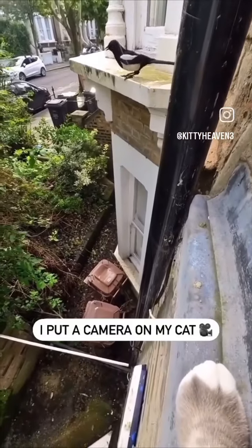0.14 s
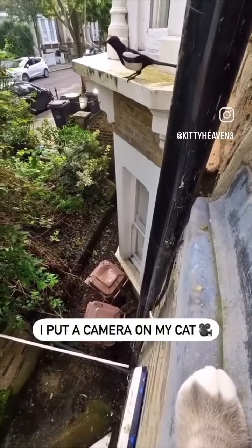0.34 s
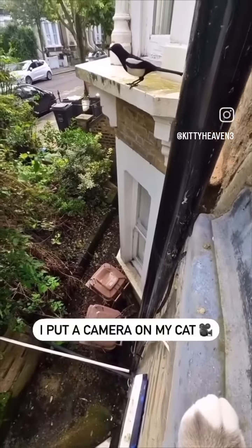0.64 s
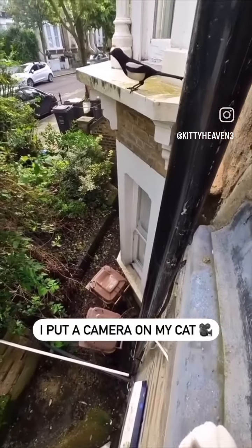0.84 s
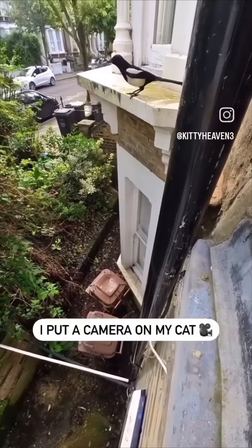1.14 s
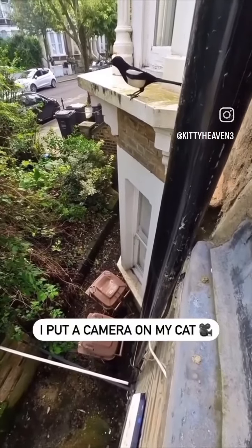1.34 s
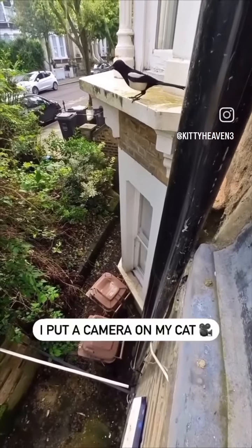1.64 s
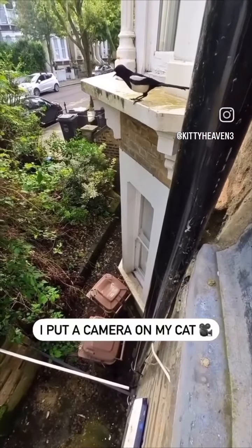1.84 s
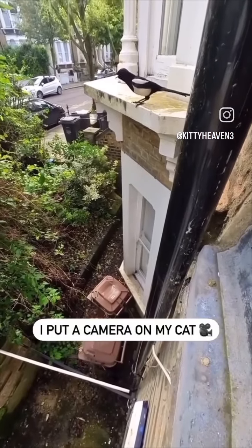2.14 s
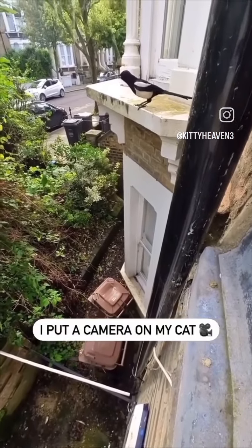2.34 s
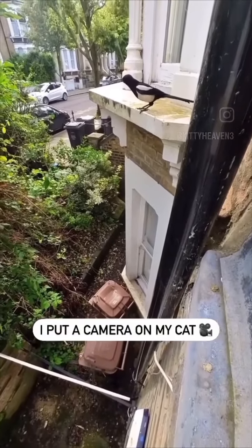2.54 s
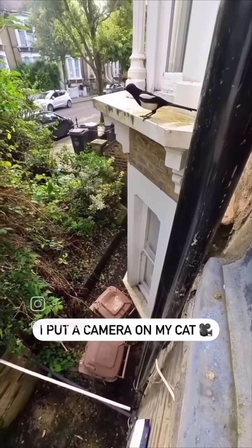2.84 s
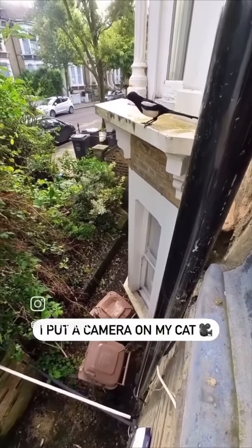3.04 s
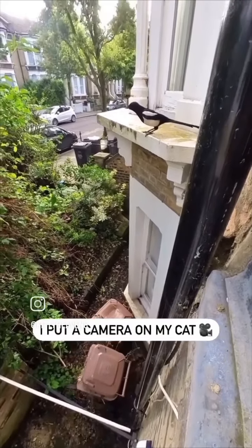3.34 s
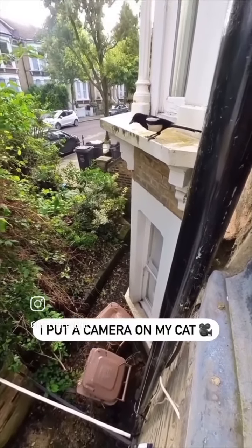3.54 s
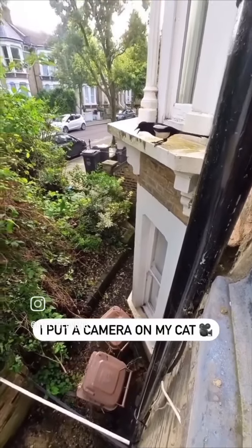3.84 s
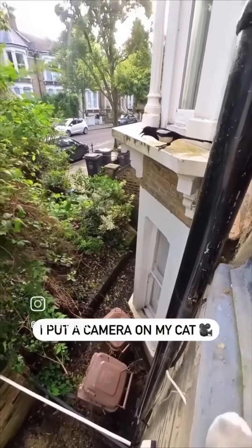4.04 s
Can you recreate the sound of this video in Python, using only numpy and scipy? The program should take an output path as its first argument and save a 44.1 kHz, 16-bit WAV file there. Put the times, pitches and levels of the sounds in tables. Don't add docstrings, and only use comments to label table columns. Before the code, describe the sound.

Low traffic hum with the tail of an earlier rattle dying away. A short close meow, then a run of coarse, machine-like magpie rattles ringing between houses. After a brief gap the cat replies with trembling, gritty little chirps stretching into mewls, amid clicks of tongue, claw or collar. More magpie rattling ends it. Cat close and dry, bird farther and echoing.

```python
import sys
import numpy as np
from scipy import signal
from scipy.io import wavfile
from scipy.ndimage import uniform_filter1d

SR = 44100
rng = np.random.default_rng(int(sys.argv[2]) if len(sys.argv) > 2 else 0)


def unload_audio(sound):
    columns = np.transpose(np.atleast_2d(sound))
    steps = np.round(np.clip(columns, -1, 1) * 32767)
    wavfile.write(sys.argv[1], SR, steps.astype(np.int16))


def makeup_ratio(level_db):
    decades = np.asarray(level_db, float) / 20
    return 10 ** decades


N = 185127
T = np.arange(N) / SR


def evened(x):
    return x / np.sqrt(np.mean(x ** 2) + 1e-20)


def read(points, hz):
    f, value = np.transpose(points)
    return np.interp(np.log(hz + 1), np.log(f + 1), value)


def add(mix, s, sound):
    part = mix[round(s * SR):][:len(sound)]
    part += sound[:len(part)]


def follow(rows):
    return np.interp(T, *np.transpose(rows))


def curves(rows):
    s, *columns = np.transpose(rows)
    return s[0], [np.interp(np.arange(s[0], s[-1], 1 / SR), s, c) for c in columns]


def whole(tables, column, quiet):
    out = np.full(N, float(quiet))
    for rows in tables:
        s, values = curves(rows)
        out[round(s * SR):][:len(values[column])] = values[column]
    return out


def steps(starts, values):
    at = np.clip(np.searchsorted(starts, T) - 1, 0, None)
    return uniform_filter1d(np.asarray(values, float)[at], size=200)


def resonate(x, hz, width):
    return signal.lfilter(*signal.iirpeak(hz, hz / width, SR), x)


def resonate_twice(x, hz, width):
    return resonate(resonate(x, hz, width), hz, width)


def lowpass(x, hz):
    return signal.sosfiltfilt(signal.butter(2, hz, fs=SR, output="sos"), x)


def coloured(points, patchy_db, size):
    hz = np.fft.rfftfreq(size, 1 / SR)
    a, b, patches = rng.standard_normal((4 * N // size + 5, len(hz), 3)).T
    patches = evened(uniform_filter1d(uniform_filter1d(patches, size=7, axis=0), size=9, axis=1))
    z = (a + 1j * b) * makeup_ratio(read(points, hz)[:, None] + patchy_db * patches)
    return evened(signal.istft(z, nperseg=size, noverlap=3 * size // 4)[1][:N])


def wander(width):
    return evened(uniform_filter1d(uniform_filter1d(rng.standard_normal(N), width), width))


def gusts(rows):
    out = np.zeros(N)
    for s, length, db, fall_db in rows:
        u = np.linspace(0, 1, round(length * SR))
        add(out, s, makeup_ratio(db + fall_db * u ** 2) * np.minimum(u * length / 0.002, 1))
    return out


# f/Hz, level/dB per Hz
HUM_COLOUR = [(12, -49.5), (20, -7.5), (107, 0.5), (223, -3.5), (261, -3), (396, -4.5), (464, -10.5),
              (515, -10.5), (847, -18), (941, -20.5), (1320, -28.5), (1810, -31), (2550, -34.5),
              (7650, -48.5), (10500, -58), (13600, -99), (22000, -120)]
# t/s, level/dB
TRAFFIC = [(0, 5), (.6, 5), (1, 4), (1.5, 2.5), (2.102, 3.5), (2.6, 2.5), (3.1, 0.5), (3.6, -1), (4.2, 0.5)]
# start t/s, length/s, level/dB, fall/dB
PEEP = [(3.472, 0.028, -41.5, -30)]


def town():
    noise = coloured(HUM_COLOUR, patchy_db=2.0, size=1024)
    low, below = lowpass(noise, 115), lowpass(noise, 750)
    traffic_db = follow(TRAFFIC)
    rumble = makeup_ratio(-43.5 + 0.36 * traffic_db) * evened(low)
    drone = makeup_ratio(-41.5 + traffic_db) * evened(below - low)
    hiss = makeup_ratio(-49 + 0.51 * traffic_db) * evened(noise - below)
    return rumble + drone + hiss + gusts(PEEP) * np.sin(2 * np.pi * 2100 * T)


def earlier_echo():
    bands = np.zeros(N)
    for hz, width, up_db, _ in BEAK:
        fall_db = 60 * T / read(ECHO_DECAY, hz)
        ring = resonate_twice(rng.standard_normal(N), hz, 2.17 * width)
        bands += makeup_ratio(up_db + 1.0 * (hz < 2400) - fall_db) * ring
    return makeup_ratio(-24.5 + 8.0) * bands * (1 + 0.34 * np.exp(-T / 0.012))


# t/s, peak level/dB, f/Hz
TICKS = [(.41, -38, 2700), (0.411, -36.5, 1260), (.626, -32, 1280), (.657, -47, 5220), (0.682, -37, 2900),
         (.7, -45, 4920), (1.473, -33.5, 990), (2.575, -31, 1280), (2.681, -23, 1260), (2.9, -26, 2000),
         (3.101, -17.5, 2350), (3.174, -28, 2400), (3.377, -28.5, 5100), (3.389, -19.5, 2420)]


def ticks():
    out, t = np.zeros(N), np.arange(500) / SR
    for (s, db, hz), noise in zip(TICKS, rng.standard_normal((len(TICKS), 500))):
        ring = np.sin(2 * np.pi * hz * t) * np.exp(-t / 0.00083)
        click = resonate(noise, 3000, 4000) * np.exp(-t / 0.00041)
        add(out, s, makeup_ratio(db) * (2.96 * ring + 0.14 * click))
    return out


def note(rows):
    attack_s, release_s, edge_db = 0.0026, 0.0097, -23
    s, (hz, effort_db, mouth) = curves(rows)
    t = np.arange(len(hz)) / SR
    edges = np.clip(1 - t / attack_s, 0, 1) + np.clip(1 - (t[-1] - t) / release_s, 0, 1) ** 2
    return np.transpose([s + t, hz, effort_db + edge_db * edges, mouth])


# t/s, pitch f/Hz, effort level/dB, mouth opening/0-1
MEOW = [(.79, 861, -19, 0.6), (.814, 858, -14.5, 0.48), (.83, 800.8, -13.5, 0.85), (.866, 825, -16.5, 0.63),
        (.94, 781, -18, 0.54), (.955, 805, -18, 0.42), (1.05, 781.3, -16.5, 0.4),
        (1.072, 744.2, -15.5, 0.39), (1.094, 793, -25.5, 0.88)]
# t/s, pitch f/Hz, effort level/dB, mouth opening/0-1
CHATTER = [
    [(2.651, 906, -29, .35), (2.666, 818, -16.5, 0.53), (2.688, 865, -21.5, 0.8)],
    [(2.705, 892, -24, .3), (2.716, 830, -16.5, 0.45), (2.73, 810, -18.5, 0.46), (2.75, 765, -19.5, 0.63)],
    [(2.769, 830, -20, 0.47), (2.789, 735, -19, .45), (2.797, 650, -21, 0.64), (2.816, 655, -17, 0.03)],
    [(2.843, 752, -19, .4), (2.86, 761, -23, 0.9), (2.9, 704.6, -21.5, 0.6)],
    [(2.912, 785, -23.5, .5), (2.926, 744, -20.5, 0.5), (2.938, 666, -21.5, 0.27), (2.95, 673, -20.5, 0.26),
     (2.964, 727, -15, 0.46)],
]
# t/s, pitch f/Hz, effort level/dB, mouth opening/0-1
MEWLS = [
    [(2.994, 782, -26, 0.34), (3.02, 757, -21.5, 0.7), (3.045, 789, -22, 0.62), (3.084, 739, -18.5, 0.42),
     (3.105, 715, -19.5, 0.52)],
    [(3.128, 820.5, -19, 0.52), (3.152, 759, -20.5, 0.68), (3.192, 830, -20.5, 0.49),
     (3.22, 765, -18.5, 0.44), (3.251, 732.5, -19.5, 0.46)],
    [(3.283, 819, -20.5, 0.46), (3.3, 819.5, -23, 0.47), (3.367, 794.6, -17, 0.39),
     (3.394, 793, -20.5, 0.41)],
]
# t/s, level/dB
CATCHES = [(0.827, -3), (1.066, -5.5), (2.661, -10), (2.672, -11.5), (2.723, -12.5), (2.798, -7),
           (2.949, -8.5), (3.087, -3.5), (3.227, -4.5)]
# leaking air level/dB, third harmonic level/dB, level of harmonics above the fourth/dB
LEAKS = [
    (-38.5, -8, -3),
    (-14, 4, -1),
    (-20, 9, 0),
    (-16.5, 0.5, 3),
    (-15.5, -12, -5),
    (-13.5, 0.5, 1),
    (-25, -3.5, -2),
    (-20.5, 1, 0),
    (-28.5, 9.5, 0),
]
# f/Hz, level/dB
THROAT = [(700, -2.5), (900, -0.5), (1300, -12.5), (1950, -9.5), (2400, -25.5), (2900, -11), (3200, -16),
          (3600, -31)]
# f/Hz, level/dB
MEW_TOP = [(3300, -2), (4000, -19), (4800, -22), (5600, -28.5), (6350, -24), (7150, -37.5), (8000, -57),
           (9500, -83.5)]


def mews():
    notes = [note(rows) for rows in [MEOW] + CHATTER + MEWLS]
    starts = [rows[0][0] - .003 for rows in notes]
    catch_db = sum(db * np.exp(-((T - s) / .0035) ** 2) for s, db in CATCHES)
    leak_db, third_db, top_db = (steps(starts, c) for c in np.transpose(LEAKS))
    leak_db = leak_db - 5 * catch_db / 10

    shake = .005 + .07 * makeup_ratio(leak_db)
    pitch_hz = uniform_filter1d(whole(notes, column=0, quiet=830), size=60)
    hz = pitch_hz * (1 + shake * wander(width=70) + .005 * catch_db)
    turns = 2 * np.pi * np.cumsum(hz) / SR

    effort_db = whole(notes, column=1, quiet=-93.5) + catch_db
    mouth = whole(notes, column=2, quiet=.4)
    mouth_hz = 1460 + 1042 * mouth
    level_db = [effort_db + read(THROAT, hz)]
    for k in range(2, 5):
        mouth_db = 17 / (1 + ((k * hz - mouth_hz) / 560) ** 2) ** 2
        level_db.append(effort_db + read(THROAT, k * hz) + mouth_db + 1.25 * wander(width=500))
    level_db[2] = level_db[2] + third_db
    top_db = level_db[0] + top_db + 0.5 * (mouth - .5)
    for k in range(5, 12):
        flicker_db = np.minimum(4.5 * wander(width=1300), 1.5) + 1.5 * wander(width=150)
        level_db.append(top_db + read(MEW_TOP, k * hz) + flicker_db - 5)

    bloom_db = -12.5 * np.exp(-np.maximum(T - steps(starts, starts), 0) / .015)
    level_db = level_db[:2] + [db + bloom_db for db in level_db[2:]]
    gains = [uniform_filter1d(makeup_ratio(db + 0.31 * wander(width=120)), size=90) for db in level_db]
    voice = sum(np.sqrt(2) * g * np.cos((k + 1) * turns + 0.78 * k) for k, g in enumerate(gains))
    breath = makeup_ratio(leak_db) * (gains[0] + gains[1]) * (1 + 0.35 * np.cos(turns))
    return voice, breath


# start t/s, length/s, level/dB, fall/dB
PUFFS = [(.757, .028, -52, -5.5), (1.055, 0.039, -41, -1.5), (1.088, 0.055, -39.5, -13.5),
         (1.103, 0.021, -35, -2.5), (2.68, 0.023, -29, -10.5), (2.745, 0.024, -30.5, 1),
         (2.812, 0.027, -25.5, 1.5), (2.895, 0.025, -34, -24), (2.964, .033, -24, -19),
         (3.098, 0.034, -30, -23.5), (3.245, 0.049, -29, -18.5), (3.39, 0.065, -31, -21),
         (3.413, 0.024, -33, -9)]
# f/Hz, level/dB per Hz
PUFF_COLOUR = [(180, -32), (300, -14), (569, -1.5), (1030, -7), (1490, -11.5), (2870, -3.5), (3540, -14),
               (4560, -20.5), (4980, -18.5), (6230, -20), (10500, -47.5), (13600, -77), (22000, -120)]
# start t/s, length/s, level/dB, fall/dB
WHEEZE = [(3.395, 0.031, -33.5, -10)]
# start t/s, length/s, level/dB, fall/dB
AIR = [(2.65, .81, -44.5, -4.5)]


def cat():
    voice, breath = mews()
    puffs = uniform_filter1d(gusts(PUFFS) * makeup_ratio(3.5), size=200)
    grit = makeup_ratio(1.7 * wander(width=50))
    wheeze = gusts(WHEEZE) * evened(resonate(rng.standard_normal(N), 5300, 160))
    voiced = uniform_filter1d(1. * (breath > 1e-4), size=300)
    jaw_noise = evened(resonate(resonate(rng.standard_normal(N), 5400, 4200), 4200, 4200))
    air = gusts(AIR) * makeup_ratio(1.6 * wander(width=700) - 5.5 * voiced) * jaw_noise
    return voice + wheeze + air + (breath + puffs) * grit * coloured(PUFF_COLOUR, patchy_db=2.5, size=256)


# first full throb t/s, wait between throbs/s, hold/s
RATTLES = [(1.7299, .0093, .011), (1.7956, .0083, .019), (1.8559, .0095, .021), (1.932, .0085, .02),
           (2.0013, .0095, .03), (2.0813, .0102, .032), (2.2219, .0085, .018), (2.3197, .0095, .028),
           (3.7461, .0085, .022), (3.8132, .0087, .027), (3.8942, .011, .013), (3.9616, .0097, .021),
           (4.0446, .011, .023)]
# effort level/dB, level of the throb before the first full one/dB
EFFORTS = [(-11.5, -4.5), (-10.5, -6), (-9, -16), (-7.5, -8), (-12.5, -21), (-8, -30), (-5.5, -5),
           (-11, -1), (-8.5, -8.5), (-10.5, -6.5), (-10, -8), (-10, -15), (-9.5, -14)]


def throbs():
    flow, t, k = np.zeros(N), np.arange(1600) / SR, np.arange(-2, 9)
    later = np.maximum(k, 0)
    chances = rng.standard_normal((len(RATTLES), 2, len(k)))
    for (first, gap, hold), (db, lead_db), chance in zip(RATTLES, EFFORTS, chances):
        past = np.maximum(k * gap - hold, 0)
        swell_db = 50 * np.minimum(later * gap, hold)
        fall_db = 360.5 * past + 9 * np.minimum(past / .005, 1)
        level_db = db + swell_db - fall_db + 1. * chance[0]
        level_db += lead_db * (k < 0) - 20.5 * (k < -1)
        times = first + k * gap + 0.00043 * later * chance[1]
        fades = gap * (.24 + .1 * later)
        for s, throb_db, fade in zip(times, level_db, fades):
            shape = (1 - np.exp(-t / .0012)) ** 2 * np.exp(-t / fade)
            add(flow, s - shape.argmax() / SR - .0006, makeup_ratio(throb_db) * shape / shape.max())
    return flow


# t/s, opening/0-1
GAPE = [(1.72, 1), (1.86, 0.1), (1.94, 0.02), (2.01, .3), (2.09, 0.08), (2.33, 0.26), (3.75, 0.3), (3.9, 0),
        (4.06, 0.5)]
# f/Hz, width/Hz, level facing up/dB, level crouched/dB
BEAK = [(766, 252, -14, -11.5), (1025, 183, -7, -7.5), (1460, 156, -8.5, -10.5), (1728, 110, -3, -5.5),
        (1996, 260, -10, -11), (2484, 273, -1, -0.5), (2974, 320, -2.5, 4), (3243, 190, -14, -12),
        (3920, 640, -18.5, -16), (4570, 250, -19, -15), (5263, 640, -8.5, -5.5), (5400, 120, -20, -9),
        (6100, 200, -12, -12.5), (7030, 640, -19, -25), (8060, 1800, -25, -20.5)]


def magpie():
    crouched = T > 3
    gape, flow = follow(GAPE), throbs()
    low_db = 8.5 * gape
    whistle_db = np.where(crouched, -11, -6.5) + 8.5 * gape
    whistle_hz = np.where(crouched, 3020, 2621) * (1 + .035 * wander(width=60))
    turns = 2 * np.pi * np.cumsum(whistle_hz) / SR
    call = makeup_ratio(whistle_db + 0.5) * flow * (np.sin(turns) + makeup_ratio(-8) * np.sin(2 * turns))

    flow = flow * makeup_ratio(1.6 * wander(width=25))
    fade = np.exp(-1 / (0.0028 * SR))
    smeared = signal.lfilter([1 - fade], [1, -fade], flow)
    for hz, width, up_db, down_db in BEAK:
        shift_db = low_db if hz < 2200 else 0 if hz > 4400 else -3
        push = flow if 2200 < hz < 6000 else smeared
        ring = resonate_twice(push * rng.standard_normal(N), hz, 1.51 * width)
        posture_db = np.where(crouched, down_db, up_db)
        call += makeup_ratio(posture_db + shift_db + 14.5 + 1.7 * wander(width=600)) * ring
    return call


# f/Hz, t60/s
ECHO_DECAY = [(500, 0.084), (2500, 0.76), (6000, 0.54), (10000, 0.79)]


def street(x):
    taps = np.zeros(SR)
    at = np.arange(400, SR - 20, 20) + rng.integers(0, 20, (SR - 401) // 20)
    taps[at] = rng.choice([-1., 1.], len(at))
    hz, t, z = signal.stft(taps, SR, nperseg=256)
    early = 1 + 7 * np.exp(-t / 0.011)
    decay = makeup_ratio(-60 * t / read(ECHO_DECAY, hz)[:, None])
    tail = signal.istft(z * early * decay, SR, nperseg=256)[1]
    return signal.fftconvolve(x, tail / np.linalg.norm(tail))[:N]


def scene():
    bird, pet = magpie(), cat()
    echoes = street(makeup_ratio(-8) * bird + makeup_ratio(-26.5) * pet)
    return (bird + pet + echoes + earlier_echo() + ticks() + town())[None]


def starved(x):
    hz, t, z = signal.stft(x, SR, nperseg=1024, noverlap=768)
    power = uniform_filter1d(abs(z) ** 2, size=3, axis=1)
    around = uniform_filter1d(power, size=21, axis=1)
    masked = uniform_filter1d(power, size=5, axis=2) < makeup_ratio(-40) * around
    slow_db = 10 * np.log10(uniform_filter1d(power, size=11, axis=2) + 1e-20)
    faint = slow_db < uniform_filter1d(slow_db, size=31, axis=1) - 4.1
    dropped = masked & (hz > 1800)[:, None] | faint & (hz > 3400)[:, None]
    z = z * np.where(dropped, makeup_ratio(-22), 1)
    z = z * np.where(hz > 8600, makeup_ratio(-7.5), 1)[:, None]
    top = power[:, hz > 9350].mean(1, keepdims=True)
    thinned = (top < np.percentile(top, 90)) & (hz > 9350)[:, None]
    z = z * np.where(thinned, makeup_ratio(-20), 1)
    return signal.istft(z, SR, nperseg=1024, noverlap=768)[1][:, :N]


def band_limit(x):
    return signal.sosfilt(signal.butter(12, 10630, fs=SR, output="sos"), x)


def record(dry):
    power = (dry ** 2).mean(0)
    power_db, slow_db = (10 * np.log10(abs(uniform_filter1d(power, size=n)) + 1e-12) for n in (900, 12000))
    fall = 37.0 * T
    over_db = np.maximum(np.maximum.accumulate(power_db + fall) - fall + 17.5, 0)
    bass = lowpass(dry, 130)
    ducked = dry - bass + bass / makeup_ratio(0.27 * np.maximum(slow_db + 25.5, 0))
    x = np.tanh(ducked / makeup_ratio(.3 * uniform_filter1d(over_db, size=200)) / 1.05) * 1.05
    edge = signal.firwin(511, 10650, window=("kaiser", 9), fs=SR)
    mix = signal.oaconvolve(starved(x), edge[None], "same")
    return band_limit(mix)


dry = scene()
out = record(dry)
unload_audio(out)
```